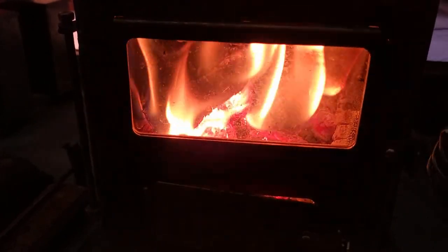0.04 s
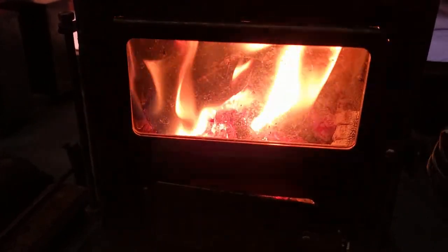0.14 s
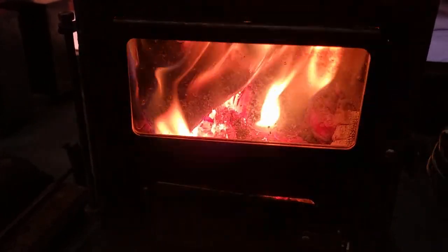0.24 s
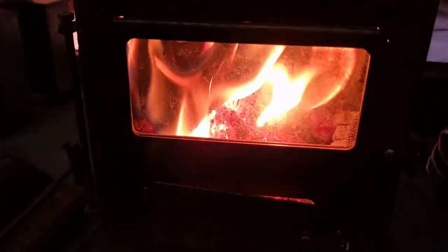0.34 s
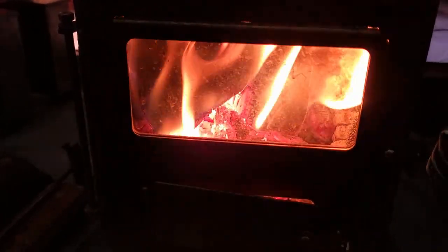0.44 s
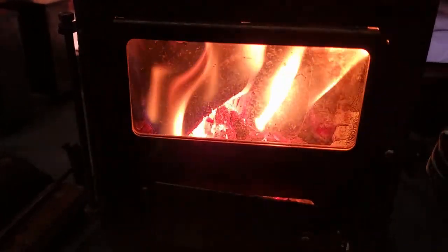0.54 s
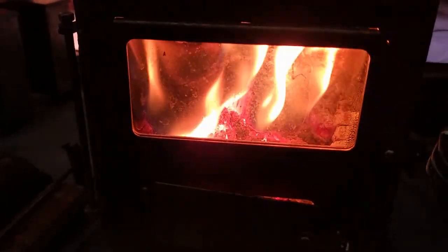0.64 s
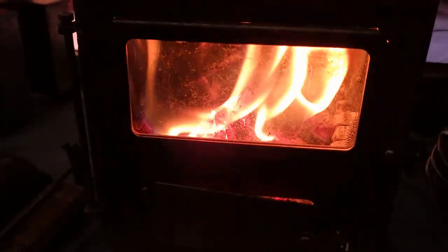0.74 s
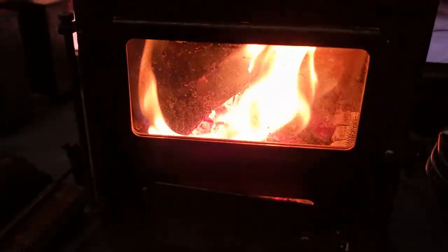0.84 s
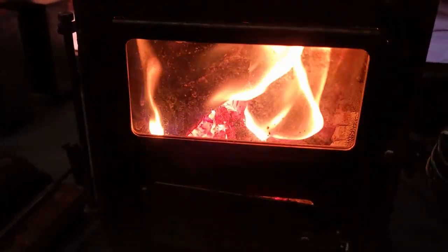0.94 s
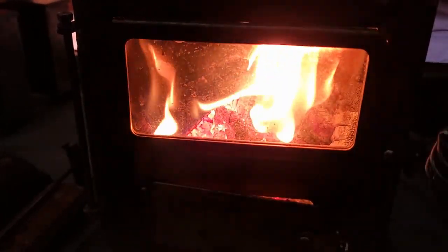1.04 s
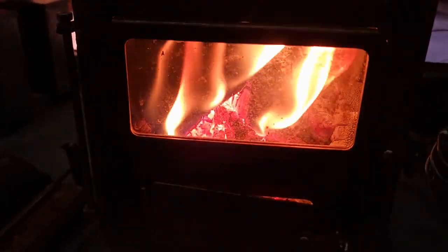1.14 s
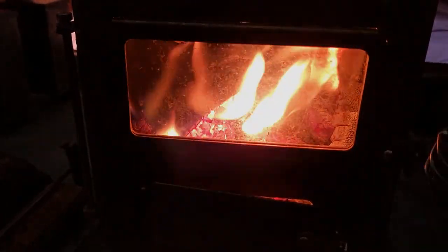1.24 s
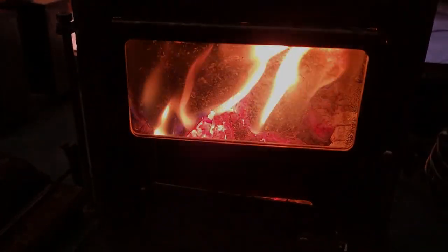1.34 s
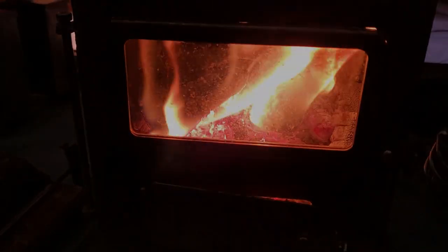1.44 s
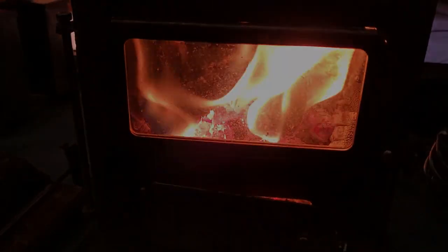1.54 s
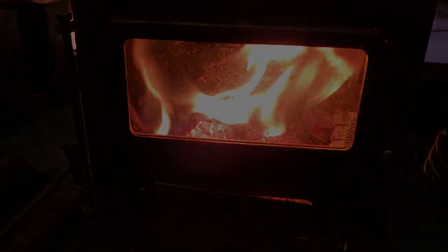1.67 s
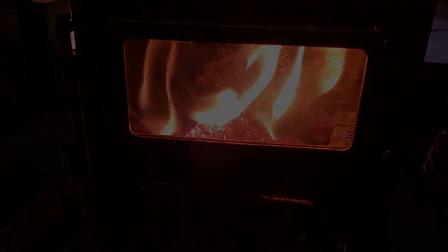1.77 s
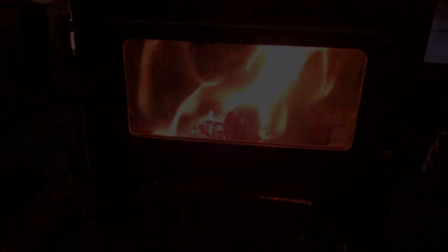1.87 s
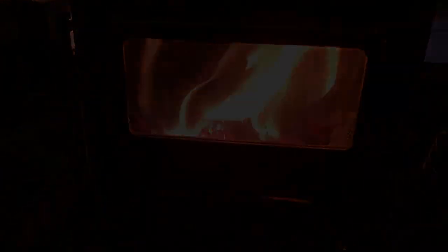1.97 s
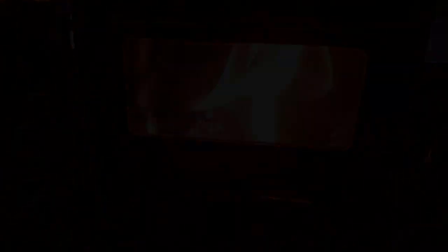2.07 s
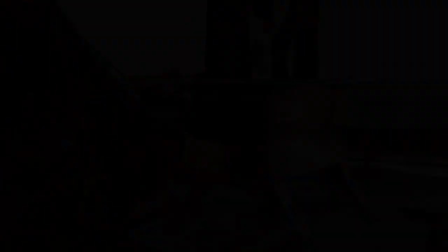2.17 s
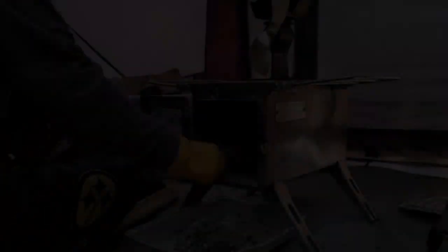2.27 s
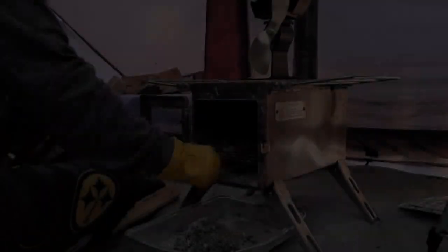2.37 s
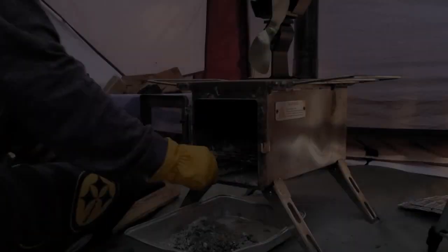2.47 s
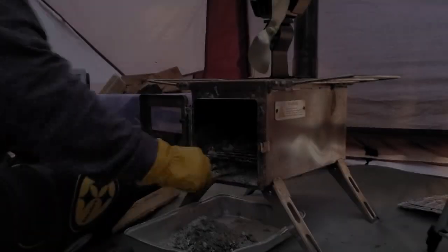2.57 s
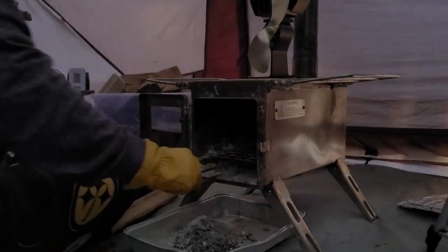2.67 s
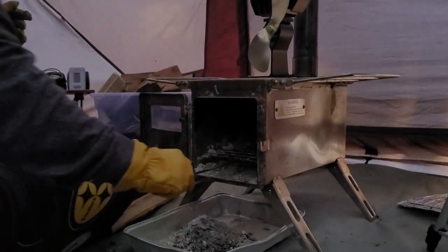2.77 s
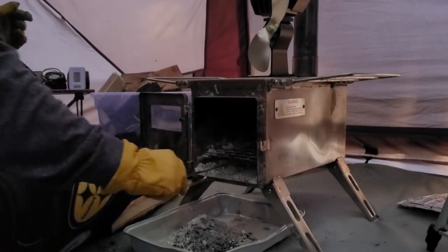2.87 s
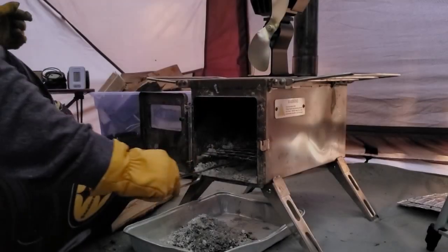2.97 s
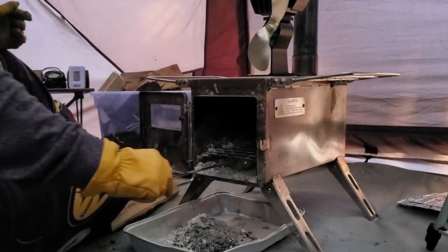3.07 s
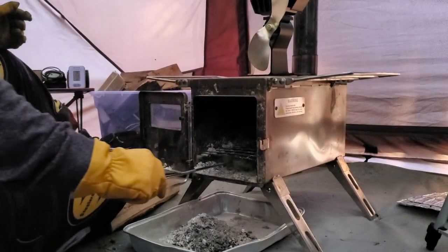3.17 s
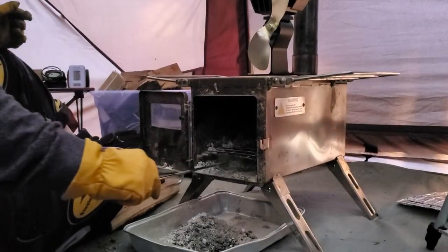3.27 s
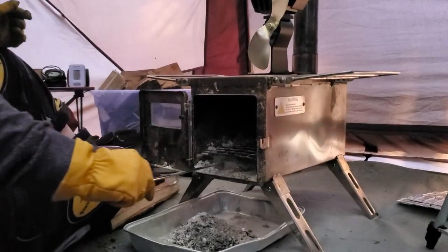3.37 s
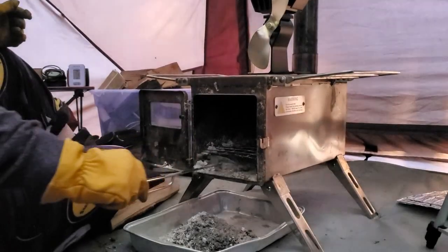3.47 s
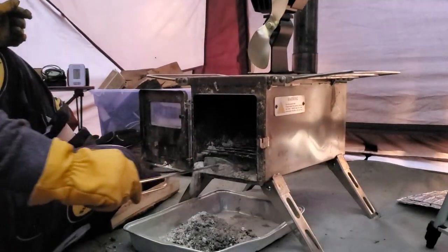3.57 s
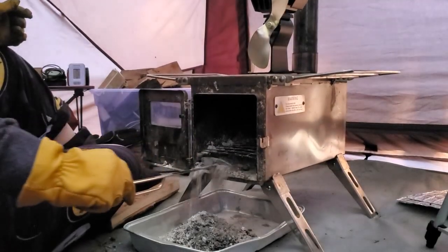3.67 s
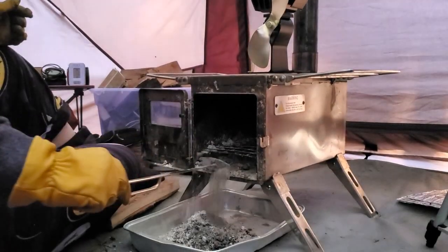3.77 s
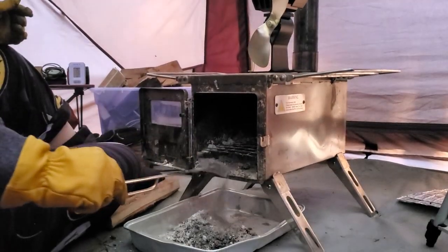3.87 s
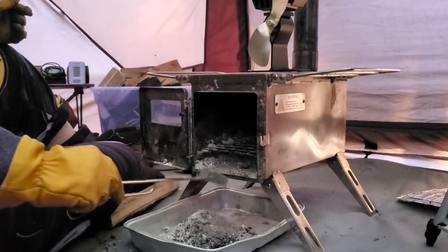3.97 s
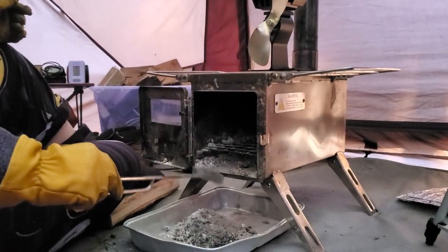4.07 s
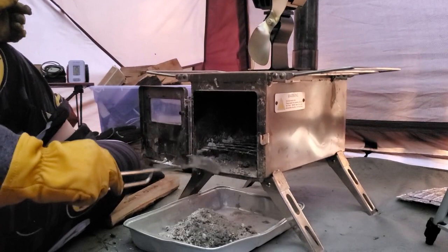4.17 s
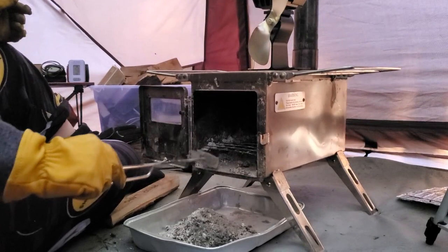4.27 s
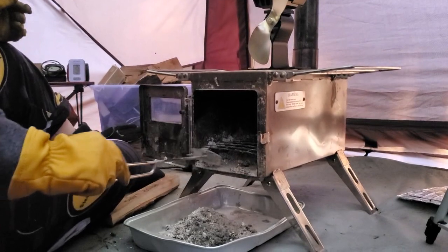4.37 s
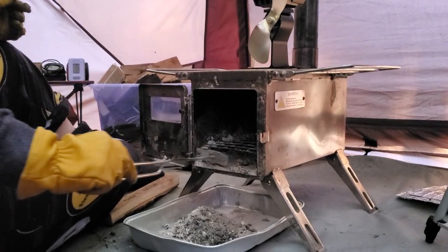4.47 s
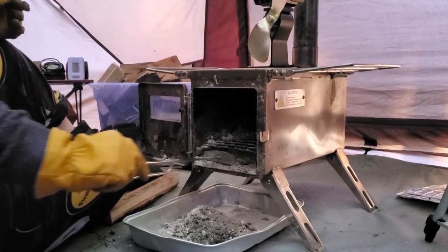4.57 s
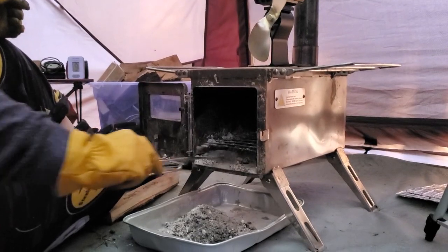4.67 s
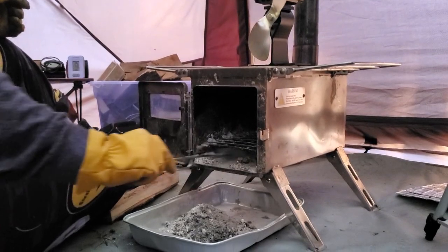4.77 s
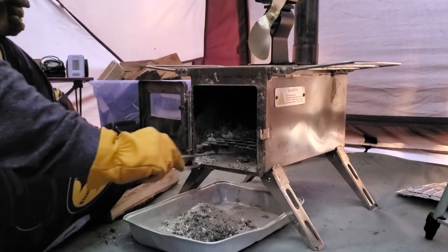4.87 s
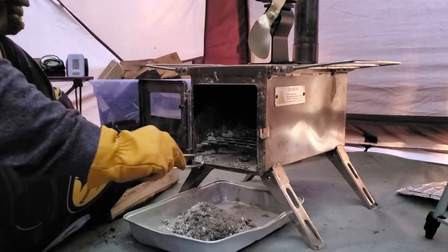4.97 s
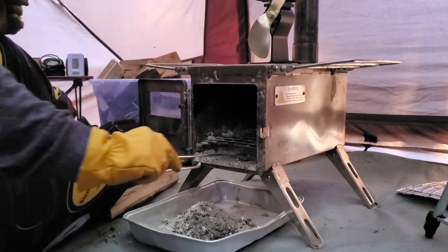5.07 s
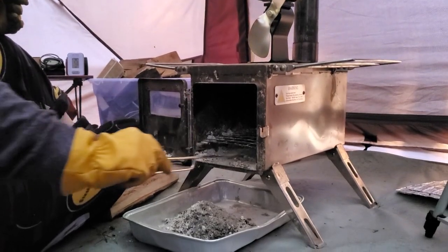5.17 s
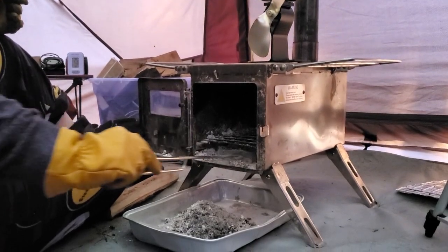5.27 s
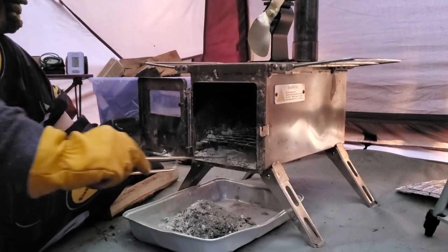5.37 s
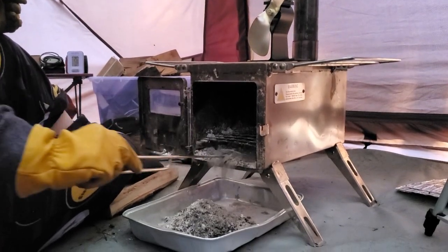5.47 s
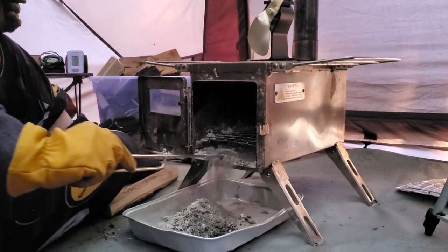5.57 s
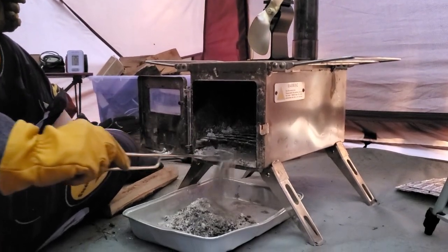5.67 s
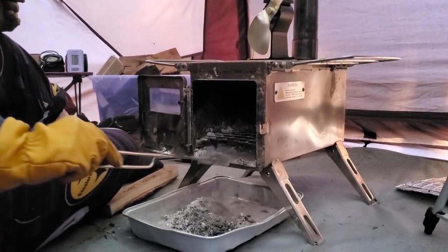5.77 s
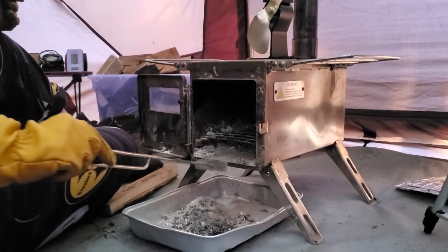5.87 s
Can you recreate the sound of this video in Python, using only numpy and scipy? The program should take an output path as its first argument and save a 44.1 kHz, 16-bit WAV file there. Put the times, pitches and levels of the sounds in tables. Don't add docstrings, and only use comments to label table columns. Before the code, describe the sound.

First comes muffled fire roar, humming air in firebox and flue, swelling in gusts with sparse soft wood pops. After an abrupt short gap, a rake scrapes ash across the floor of a cold hollow steel stove, jolting over cinders with clinks and brief squeals. The long scrape stops near four seconds; a second shorter one follows. The tent is dry and quiet, the microphone close.

```python
import sys
import numpy as np
from scipy import signal
from scipy.fft import rfft, irfft
from scipy.io import wavfile
from scipy.ndimage import uniform_filter1d

SR = 44100
rng = np.random.default_rng(int(sys.argv[2]) if len(sys.argv) > 2 else 0)


def materialize(psi):
    bounded = np.clip(np.atleast_2d(psi).T, -1, 1)
    quanta = np.round(bounded * 32767).astype(np.int16)
    wavfile.write(sys.argv[1], SR, quanta)


def linear_from_db(decibels):
    return 10 ** (np.asarray(decibels, float) / 20)


N = 261513
FIRE_END_S, RAKE_START_S = 2.142, 2.2

ZONES_HZ = [230, 900, 3000, 6500, 16000]
# frequency in Hz, balance in dB
STEEL_BALANCE = [(60, -1.0), (180, -11.5), (550, 1), (1650, -7), (4970, -0.5), (15000, -1)]
# time in seconds, sharpness as a factor, wall drive in dB, edge zone in dB, squeal as a factor
FOCUS = [(2.2, 1.8, -6.5, 6, 0.23), (2.8, 1.32, -8, 1, 0.087), (3.2, 0.63, 0, -2.5, 0.13),
         (3.7, 0.86, -4, 1, .1), (3.85, 0.78, -7, -6.5, 0.096), (4.8, 0.92, -1, -2, .1),
         (5.45, 0.8, -4.5, 1.5, 0.26), (5.6, 1.5, -6, -0.5, 1.6), (5.7, 2.9, 3, -1.5, 1.3),
         (5.78, 2.2, -10, 2, 3.7), (5.93, 1.3, -24.5, 3, 1.4)]


def in_time(rows):
    s, *columns = np.transpose(rows)
    return [np.interp(np.arange(N) / SR, s, column) for column in columns]


def at_hz(points, hz):
    curve_hz, value = np.transpose(points)
    return np.interp(np.log(hz), np.log(curve_hz), value)


def rms_one(x):
    return x / np.sqrt(np.mean(x ** 2) + 1e-20)


def drift(rate):
    r = np.exp(-80 * np.pi * rate / SR)
    slow = signal.lfilter([1], [1, -2 * r, r * r], rng.standard_normal(N // 40 + 2002))[2000:]
    return np.interp(np.arange(N) / 40, np.arange(len(slow)), rms_one(slow))


def swell_db(s, width):
    return -11.5 * np.abs((np.arange(N) / SR - s) / width) ** 1.51


def ring(x, hz, t60):
    r, w = linear_from_db(-60 / (t60 * SR)), 2 * np.pi * hz / SR
    return signal.lfilter([0, np.sin(w)], [1, -2 * r * np.cos(w), r * r], x + 1e-18)


def two_ears(mid, side, alike):
    return np.sqrt(1 + alike) * mid + np.sqrt(1 - alike) * side * [[1], [-1]]


def air_noise(gain_of_hz):
    # frequency in Hz, likeness of the two ears from 0 to 1
    air_likeness = [(60, 0.96), (180, 1), (550, 0.3), (1650, 0), (4970, 0), (15000, 0.4)]
    hz = np.maximum(np.arange(N // 2 + 1) * SR / N, 1)
    mid, side = rfft(rng.standard_normal((2, N)))
    both = two_ears(mid, side, np.clip(at_hz(air_likeness, hz), 0, 1))
    return rms_one(irfft(both * gain_of_hz(hz), N))


def microphone_hiss():
    # frequency in Hz, density in dB per Hz
    hiss_colour = [(590, -33), (1000, -9.5), (1290, -2), (1480, -2), (2120, -3.5), (2930, -3.5),
                   (4540, -6.5), (5150, -1.5), (5720, -8), (6720, -17), (7550, -9.5), (8470, -4.5),
                   (10100, -9), (15100, -5.5), (15800, -21)]
    return air_noise(lambda hz: linear_from_db(at_hz(hiss_colour, hz)) * (hz > 900))


def birds():
    # start in seconds, length in seconds, first pitch in Hz, last pitch in Hz, level in dB
    whistles = [
        (0.302, 0.092, 3080, 3300, -75),
        (0.446, 0.11, 2330, 2500, -76),
        (.58, 0.16, 2880, 3220, -73),
        (.74, 0.16, 2200, 2720, -72),
        (0.916, 0.11, 2960, 2750, -71),
        (5.85, 0.15, 2500, 3300, -66),
        (5.903, .08, 3200, 3300, -64),
    ]
    out = np.zeros(N + SR)
    for s, length, first_hz, last_hz, db in whistles:
        n = round(length * SR)
        phase = 2 * np.pi * np.cumsum(np.linspace(first_hz, last_hz, n)) / SR
        out[round(s * SR):][:n] += linear_from_db(db) * np.hanning(n) * np.sin(phase)
    return out[:N] * [drift(160), drift(156)]


def tent(force):
    # time in seconds, ground rumble in dB, leg boom in dB
    thumps = [(2.23, -41, -39.5), (2.29, -45, -42.5), (2.37, -49.5, -46), (2.471, -51, -44.5),
              (2.76, -50, -35), (2.94, -70, -44.5), (3.11, -53, -44.5), (3.33, -51.5, -44),
              (3.66, -52.5, -48.5), (3.98, -54, -64.5), (4.36, -62, -71.5), (4.819, -73.5, -84.5),
              (5.13, -72.5, -69), (5.45, -68, -50.5), (5.92, -64, -72.5)]
    # frequency in Hz, density in dB per Hz
    still_colour = [(12, -34), (30, -3), (91, 4), (238, -23), (285, -10), (424, -27.5), (665, -26),
                    (1500, -36.5), (1950, -65), (3300, -120)]
    t = np.arange(N) / SR
    box_power = uniform_filter1d(force[0, 0] ** 2, size=round(0.11 * SR))
    box_db = 10 * np.log10(box_power + 1e-9)
    power = linear_from_db(np.array([[-58.5], [-54]]) + (box_db + 34.5) * [[0.33], [0.8]]) ** 2
    for s, rumble_db, boom_db in thumps:
        shape = linear_from_db(np.minimum(250.5 * (t - s), 115.5 * (s - t)))
        power = power + np.outer(linear_from_db([rumble_db, boom_db]), shape) ** 2

    def rumble_gain(hz):
        return (hz < 130) / np.hypot(1, (hz - 85) / 30) * hz ** 2 / (hz ** 2 + 2500)

    def boom_gain(hz):
        return (hz > 120) * (hz < 260) / np.hypot(1, (hz - 176) / 20)

    rumble = linear_from_db(0.5 * drift(8.5)) * air_noise(rumble_gain)
    boom = air_noise(boom_gain)
    still = linear_from_db(-65.5) * air_noise(lambda hz: linear_from_db(at_hz(still_colour, hz)) * (hz < 1500))
    return np.sqrt(power[0]) * rumble + np.sqrt(power[1]) * boom + still


def pops():
    # time in seconds, peak in dB, pitch in Hz, t60 in seconds
    spits = [
        (0.287, -59, 8650, .03),
        (.69, -60, 2800, .02),
        (1.37, -62, 1900, .02),
        (1.43, -68, 9000, .02),
        (1.61, -53, 620, 0.33),
        (1.645, -68, 1500, .03),
        (1.919, -55, 8300, 0.022),
        (2.03, -64, 11200, 0.017),
        (2.07, -54, 736.6, 0.42),
    ]
    out, t = np.zeros((2, N)), np.arange(SR // 8) / SR
    for s, db, hz, t60 in spits:
        shape = linear_from_db(-60 * t / t60) * (1 - np.exp(-t / (0.037 * t60)))
        spit = rng.standard_normal((2, len(t))) * shape
        spit = signal.sosfilt(signal.butter(1, [hz * 0.96, hz * 1.08], "band", fs=SR, output="sos"), spit)
        out[:, round(s * SR):][:, :len(t)] += linear_from_db(db) * spit / np.abs(spit).max()
    return out


def fire():
    # time in seconds, roar in dB
    draught = [
        (0.0, -50),
        (0.1, -45),
        (0.26, -44),
        (0.58, -50),
        (0.66, -39),
        (1.5, -40),
        (1.88, -39.5),
        (1.98, -45.5),
        (2.14, -34.5),
    ]
    # time in seconds, level above the draught in dB, half width in seconds
    surges = [
        (0.0, 10, 0.14),
        (0.7, 2, 0.056),
        (0.83, 6.5, 0.056),
        (1.16, 5, 0.074),
        (1.37, 8, 0.033),
        (1.5, 6, 0.018),
        (1.63, 9.5, 0.027),
        (1.89, 7, 0.06),
    ]
    # frequency in Hz, density in dB per Hz
    flame_colour = [(12, -45), (25, -17), (48, -3.5), (70, -0.5), (124, -10.5), (178, -9), (306, -27.5),
                    (367, -28), (409, -36.5), (619, -34), (1500, -54), (1950, -91), (3300, -120)]
    # pitch in Hz, width in Hz, level in dB
    air_modes = [(61.9, 6.4, -2), (87.6, 36, -10), (166, 9.1, -4.5), (193, 7.8, -8.5)]
    draught_db, = in_time(draught)
    surge_db = sum(db * linear_from_db(swell_db(s, width)) for s, db, width in surges)
    roar_db = draught_db + surge_db
    flue_db = -43.5 + (draught_db + 40.5) - 0.76 * surge_db

    def hum(hz, rows):
        return sum(linear_from_db(db) / np.hypot(1, 2 * (hz - f) / width) for f, width, db in rows)

    def firebox_gain(hz):
        return hum(hz, air_modes[:2]) * (hz < 125) * hz ** 2 / (hz ** 2 + 1600)

    def flue_gain(hz):
        return hum(hz, air_modes[2:]) * (hz < 260) * (hz > 110)

    roar = linear_from_db(roar_db - 3.0) * air_noise(firebox_gain)
    flue = linear_from_db(flue_db - 6.5 + 1.7 * drift(7.2)) * air_noise(flue_gain)
    flame_level = linear_from_db(0.2 * roar_db + drift(4) - 38.0)
    flame = flame_level * air_noise(lambda hz: linear_from_db(at_hz(flame_colour, hz)) * (hz < 1500))
    return roar + flue + flame


def cavity(steel):
    t = np.arange(SR * 3 // 4) / SR
    tail = rng.standard_normal((2, len(t))) * [[1], [0.4]] * linear_from_db(-60 * t)
    mid, side = signal.sosfilt(signal.butter(2, [400, 1400], "band", fs=SR, output="sos"), tail)
    tail = np.array([mid + side, mid - side]) / np.sqrt(np.sum(mid ** 2))
    return linear_from_db(-31.5) * signal.fftconvolve(steel.mean(axis=0)[None], tail, axes=1)[:, :N]


def struck(knocks, modes):
    clicks, out = np.zeros(N), np.zeros(N)
    for s, db in knocks:
        clicks[round(s * SR)] = linear_from_db(db)
    for hz, db, t60 in modes:
        twin = 0.6 * ring(clicks, hz * 1.1, 1.3 * t60)
        out += linear_from_db(db) * (ring(clicks, hz, t60) + twin)
    return out


def shell():
    # time in seconds, level in dB
    last_knocks = [
        (3.889, -54),
        (5.755, -60),
    ]
    # pitch in Hz, level in dB, t60 in seconds
    shell_modes = [(483, -5, 0.97), (664, -9.5, 1.23), (1110, -6, 0.98), (1206, -5, 0.55), (1280, -12, .63),
                   (1690, -16, .48), (1728, -15, .5), (2180, -6.5, .38)]
    return struck(last_knocks, shell_modes)


def rake_rod():
    # time in seconds, level in dB
    rod_knocks = [(2.862, -36), (2.9, -47), (2.937, -40), (3.055, -45), (3.135, -46), (3.195, -50),
                  (3.24, -47), (5.238, -43), (5.303, -36.5), (5.315, -44), (5.375, -49)]
    return struck(rod_knocks, [(12516, 0, 0.07)])


def box_knocks():
    # time in seconds, level in dB, pitch in Hz, t60 in seconds
    wall_knocks = [(2.212, -33, 423, .2), (2.222, -30, 422, .25), (2.238, -29.5, 424.6, 0.21),
                   (2.258, -30.5, 171.5, 0.39), (4.926, -35, 500, 0.064), (5.557, -43.5, 590, 0.068),
                   (5.79, -55, 1144, .4), (2.25, -40, 477, 0.17), (2.752, -27, 360, .25),
                   (2.765, -28, 629, 0.12), (2.865, -32, 345, 0.24), (2.938, -32.5, 309.5, 0.32),
                   (3.048, -34, 304, .2), (3.797, -40, 937, 0.098), (3.889, -40.5, 1416, .12),
                   (5.236, -27, 2193, 0.11), (5.671, -39, 1456, 0.25), (5.72, -51, 1394, .2),
                   (5.69, -48, 1830, .15)]
    return sum(struck([(s, db)], [(hz, 0, t60)]) for s, db, hz, t60 in wall_knocks) * linear_from_db([[-1.5], [1.5]])


def walls(force):
    # pitch in Hz, level in dB, t60 in seconds
    wall_modes = [(294, -26, 0.65), (310.8, -10.5, 0.35), (364, -13, 0.22), (416, -13, 0.22),
                  (470, -25, 0.96), (518, -13, 0.2), (544, -25.5, 0.15), (645, -22, 1.6), (876, -19, 0.62),
                  (1020, -26.5, 0.25), (1102, -22, 0.64), (1142, -24, 0.4), (1184, -19, 0.49),
                  (1280, -23, 0.5), (1360, -20, 0.22), (1422, -10, 0.31), (1803, -22.5, 0.34),
                  (2030, -12, .12), (2050, -9.5, 0.23), (2180, -22, 0.36), (2360, -17, 0.35),
                  (2680, -22, 0.29), (4200, -16.5, 0.12), (4330, -22.5, 0.11), (4600, -22, .1),
                  (5860, -17, 0.18), (12516, -14, 0.17)]
    out, start, drive_db = np.zeros((2, N)), round(FIRE_END_S * SR), in_time(FOCUS)[1]
    for hz, db, t60 in wall_modes:
        zone = np.searchsorted(ZONES_HZ, hz) - 1
        drive = (force[zone, 0] * linear_from_db(db + drive_db - 27.0 + 3.5 * drift(6.5)))[start:]
        twin = ring(drive, hz * rng.uniform(1.008, 1.018), 0.76 * t60)
        tone = ring(drive, hz, t60) - 0.73 * twin
        lean = linear_from_db(at_hz(STEEL_BALANCE, hz) / 2)
        out[:, start:] += [tone * lean, np.roll(tone, rng.integers(-9, 9)) / lean]
    return out


def rake_force():
    # touch in seconds, lift in seconds
    contacts = [
        (2.2, 3.95),
        (4.791, 5.765),
    ]
    drag_db = [-56.5, -63.5, -72, -61.5]
    # time in seconds, half width in seconds, panel in dB,
    # box above the panel in dB, grit above the panel in dB
    pushes = [(2.231, 0.11, -34, -4.5, -21), (2.412, 0.089, -31, -6.5, -11.5), (2.569, 0.13, -52.5, 1, -2),
              (2.698, 0.022, -43.5, 13.5, 8.5), (2.76, 0.029, -31.5, -7, -2.5),
              (2.725, 0.044, -31.5, -0.5, -2), (2.871, 0.15, -33, 2, -4), (2.958, 0.055, -47, 4, 2.5),
              (3.099, 0.096, -39.5, 1, -20), (3.19, 0.28, -46.5, 9, -0.5),
              (3.309, 0.091, -34.5, 1.5, -11.5), (3.417, 0.051, -38, -2, -7.5),
              (3.571, 0.074, -40, 0.5, -6.5), (3.656, 0.041, -36, -1.5, -9),
              (3.746, 0.013, -45.5, -16, 6.5), (3.82, 0.091, -37.5, -4.5, -13.5),
              (3.90, 0.051, -54.5, 3.5, -1), (4.873, 0.071, -46.5, 0.5, -1), (4.969, 0.031, -47, 3, 3.5),
              (5.066, 0.099, -34, 2.5, -25), (5.133, 0.066, -35.5, 2.5, -6.5),
              (5.288, 0.079, -36, -2, -6.5), (5.418, 0.085, -38, -8, -10.5), (5.6, 0.0086, -63, -8, 1),
              (5.633, 0.028, -48, -2.5, -0.5), (5.66, 0.016, -51.5, -1, 5), (5.69, 0.053, -47.5, -5, -3),
              (5.754, 0.041, -40.5, -10, -8.5)]
    # time in seconds, peak in dB, box and grit above the panel in dB
    jolts = [(2.2058, -27.5, 9, -0.5), (2.2209, -14.5, -9.5, -16.5), (2.247, -16.5, -15, -29),
             (2.3612, -18, -18, -33), (2.3969, -17, -11.5, -13.5), (2.6341, -22, 4, -33),
             (2.6502, -19.5, 2.5, -5), (2.678, -22, -13, 0), (2.694, -6.5, -38, -11.5),
             (2.7472, -4, -0.5, -11), (2.75, -4, -7, -16), (2.76, -20, -12, -18), (2.773, -27, -12, -21),
             (2.8562, -18, -16, -4), (2.9315, -13, -3.5, -1), (3.042, -25, 9.5, -17.5), (3.05, -27, 9, -2),
             (3.097, -21, 5, -31), (3.1615, -20, -4, -9), (3.231, -24, 9, -23), (3.285, -17, -10, -28),
             (3.352, -26, 6.5, -5), (3.4062, -24, 2.5, -25), (3.5131, -24, 6.5, -33), (3.5222, -24, 3, -15),
             (3.544, -30.5, 8.5, -15.5), (3.6268, -27, 3, -17), (3.6763, -25.5, -20.5, 3),
             (3.741, -23, -25, -2), (3.796, -28, -6, -28), (3.8469, -29, -10.5, -9),
             (3.8891, -18.5, -12.5, -8), (4.801, -34.5, 1, 1.5), (4.9257, -20.5, 6, -70),
             (4.9547, -25, -15, 1), (5.0203, -39, -3, 0), (5.067, -26, -10, -30), (5.108, -19, 0.5, -28),
             (5.166, -18, 3, -22), (5.2359, -7.5, -5.5, -16.5), (5.3661, -22.5, -5.5, 4),
             (5.4304, -26.5, -4, 6), (5.4784, -24, -20, -4.5), (5.5576, -36.5, 6.5, -25),
             (5.612, -36, -16, 5.5), (5.671, -22, -15, -38), (5.689, -24.5, -19, -35.5)]
    # time in seconds, peak in dB, t60 in seconds
    cinders = [(2.528, -41, 0.035), (2.687, -25.5, 0.022), (2.8957, -38, .04), (2.999, -35.5, .02),
               (3.1361, -39, 0.071), (3.235, -47, 0.037), (3.3216, -36, 0.06), (3.3707, -44, 0.025),
               (3.5562, -42, .04), (3.8868, -36, .015), (3.918, -45, .015), (3.944, -60, 0.011),
               (3.965, -60, 0.014), (3.976, -50.5, .015), (3.9926, -53, .015), (4.0111, -51, .012),
               (4.0896, -58, 0.025), (4.7248, -66.5, .03), (5.081, -51, .03), (5.1164, -47, 0.033),
               (5.2382, -33, 0.013), (5.2558, -31, .03)]
    # time in seconds, box in Hz, panel in Hz, edge in Hz
    place = [(2.2, 424, 1800, 3760), (2.3, 431, 1910, 3730), (2.42, 468, 2060, 3830),
             (2.7, 400, 2010, 4170), (2.76, 400, 1870, 4000), (2.88, 349, 1850, 4200),
             (2.97, 363, 1840, 4230), (3.07, 484, 2050, 4200), (3.3, 583, 2000, 4060),
             (3.43, 550, 1260, 4400), (3.55, 568, 1244, 3900), (3.65, 590, 1810, 4140),
             (3.75, 503, 2180, 4300), (3.8, 610, 1240, 4300), (3.9, 510, 1360, 4100),
             (4.06, 506, 1130, 3620), (4.8, 542, 1570, 4060), (5.0, 495, 1570, 4300),
             (5.18, 523, 2070, 3700), (5.25, 507, 2230, 4600), (5.5, 584, 1380, 4600),
             (5.7, 523, 1400, 4030), (5.77, 533, 1540, 4050), (5.85, 500, 1150, 4440)]
    t, age, stick = np.arange(N) / SR, np.arange(SR // 6) / SR, SR // 60
    touching = sum(np.interp(t, [down - 0.004, down, up, up + 0.11], [0, 1, 1, 0]) ** 3.7 for down, up in contacts)
    power = linear_from_db(drag_db)[:, None] ** 2
    for s, width, db, box_db, grit_db in pushes:
        zones_db = db - 1.5 + np.array([box_db, 0, 0.5 + grit_db, grit_db])
        power = power + np.outer(linear_from_db(zones_db), linear_from_db(swell_db(s, width))) ** 2
    power = power * touching
    cracks = np.zeros((4, 1, N))
    for s, db, box_db, grit_db in jolts:
        edge_db = -3.5 + 0.23 * grit_db
        t60 = 0.082 + 0.001 * (db + 17.5)
        i, gain = round(s * SR), linear_from_db(db - 15.5 + np.array([box_db, 0, edge_db, grit_db]))
        power[:, i - stick:i] *= linear_from_db(np.linspace(0, -11.0, stick))
        shape = linear_from_db(-60 * (age / t60) ** 1.192) * (1 - np.exp(-age / 0.0008))
        power[:, i:i + len(age)] += np.outer(gain, shape) ** 2
        cracks[:, 0, i] = [8, 7, 4, 2] * gain
    for s, db, t60 in cinders:
        shape = linear_from_db(-60 * age / t60)
        power[2:, round(s * SR):][:, :len(age)] += np.outer(linear_from_db([db - 7.5, db]), shape) ** 2
    sizes = linear_from_db(2.6 * np.minimum(rng.exponential(1, N), 4)) * rng.choice([-1, 1], N)
    falling = rng.random(N) < 9000 / SR
    grains = rms_one(sizes * falling * linear_from_db(2.85 * drift(53) + 1.5 * drift(280)))
    ash = np.array([0.03, 0.35, 0.5, 0.55])[:, None, None]
    rub = np.sqrt(1 - ash) * grains + np.sqrt(ash) * rng.standard_normal((2, N))
    power[2] *= linear_from_db(in_time(FOCUS)[2]) ** 2
    return np.sqrt(power)[:, None] * rub + cracks, in_time(place)


def panels(force, pitches_hz, count=600, step=4400):
    # frequency in Hz, density in dB per Hz
    steel_colour = [(245, -25.5), (330, -1), (500, 0), (630, 6), (800, -4), (1050, -21.5), (1400, -14),
                    (1680, -22.5), (2050, -15), (2700, -17.5), (4400, -26.5), (5800, -22), (7100, -29.5),
                    (8600, -21.5), (15800, -24.5)]
    # frequency in Hz, t60 in seconds
    damping = [(250, 0.073), (600, 0.1), (2000, 0.11), (6000, 0.19), (15000, 0.01)]
    # frequency in Hz, likeness of the two ears from 0 to 1
    steel_likeness = [(250, 0.94), (550, 1), (1000, 0.6), (2500, 0.1), (7000, 0.4), (15000, 0)]
    # pitch in Hz, relative width as a ratio, strength as a factor (negative for a dead spot)
    blade_modes = [(4400, 0.17, 0.92), (8150, 0.16, .7), (12200, .06, .3), (6300, .09, -1.7),
                   (10200, 0.058, -0.83), (14800, .09, -0.83)]

    hz = np.sort(ZONES_HZ[0] + 15600 * rng.random(count) ** 1.6)
    t = np.arange(SR // 7) / SR
    t60 = at_hz(damping, hz)
    decay = np.log(1000) / (t60 * rng.uniform(0.3, 1.0, count))
    waves = np.exp(np.outer(2j * np.pi * hz - decay, t))
    n_brief = SR // 50
    brief = waves[:, :n_brief] * linear_from_db(-60 * t[:n_brief] / (0.0029 + 6.8 / hz[:, None]))
    alike = np.clip(at_hz(steel_likeness, hz), 0, 1)
    per_mode = linear_from_db(at_hz(steel_colour, hz)) * np.sqrt(hz ** 0.375 / t60)
    per_mode = per_mode * linear_from_db(at_hz(STEEL_BALANCE, hz) / 2 * [[1], [-1]])
    share = np.sin(np.pi * np.arange(2 * step) / (2 * step))
    phase = rng.uniform(0, 2 * np.pi, (2, count))
    focus, *_, squeal = in_time(FOCUS)
    out = np.zeros((2, N + 2 * step + len(t)))
    force = np.pad(force, ((0, 0), (0, 0), (0, 2 * step)))

    def bump(centre_hz, width):
        return np.exp(-(np.log(hz / centre_hz) / width) ** 2)

    for i in range(round(FIRE_END_S * SR) - step, N - step, step):
        now = i + step
        phase = phase + rng.normal(0, 1, (2, count)) * np.minimum(hz / 1200, 2.5)
        mid, side = linear_from_db(rng.normal(0, 2.2, (2, count))) * np.exp(1j * phase)
        ears = two_ears(mid, side, alike) * per_mode
        for pitch_hz, boost, width in zip(pitches_hz, (3.2, 1.8, 1.2), (0.17, 0.2, 0.16)):
            ears = ears * (1 + boost * focus[now] * bump(pitch_hz[now], width))
        for blade_hz, width, boost in blade_modes:
            ears = ears * np.maximum(1 + boost * squeal[now] * bump(blade_hz, width), 0.1)
        for zone, low, high in zip(force, ZONES_HZ, ZONES_HZ[1:]):
            inside = slice(*np.searchsorted(hz, [low * 0.87, high * 1.15]))
            edge = np.minimum(np.log(hz[inside] / low), np.log(high / hz[inside]))
            mix = ears[:, inside] * np.sin(np.pi / 4 * np.clip(1 + edge / 0.14, 0, 2))
            answer = (mix @ waves[inside]).imag
            answer[:, :n_brief] += 1.3 * (mix @ brief[inside]).imag
            answer = answer / np.sqrt(np.sum(answer.mean(axis=0) ** 2))
            heard = signal.fftconvolve(zone[:, i:i + 2 * step] * share, answer, axes=1)
            out[:, i:i + heard.shape[1]] += heard
    return signal.sosfilt(signal.butter(4, 250, "high", fs=SR, output="sos"), out[:, :N])


def scene():
    # time in seconds, level in dB
    gate = [
        (2.2, -79),
        (4.0, -64),
        (4.15, -82),
        (4.66, -83),
        (4.72, -74.5),
        (5.78, -78),
        (5.83, -75),
        (5.93, -80),
    ]
    t = np.arange(N) / SR
    hiss = microphone_hiss()
    burning = fire() + linear_from_db(-71) * hiss
    force, pitches_hz = rake_force()
    steel = panels(force, pitches_hz) + walls(force) + shell() + rake_rod() + box_knocks()
    raking = steel + cavity(steel) + tent(force) + linear_from_db(in_time(gate)[0]) * hiss
    before = np.clip((FIRE_END_S - t) / 0.002, 0, 1)
    after = np.clip((t - RAKE_START_S) / 0.017, 0, 1)
    return (pops() + birds()) * (before + after) + burning * before + raking * after


def top_cut(x):
    return signal.sosfilt(signal.butter(12, 15850, fs=SR, output="sos"), x)


def record(dry):
    mix = signal.sosfilt(signal.cheby2(18, 50, 16100, fs=SR, output="sos"), dry)
    return top_cut(mix)


dry = scene()
out = record(dry)
materialize(out)
```